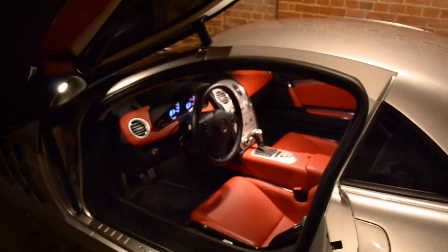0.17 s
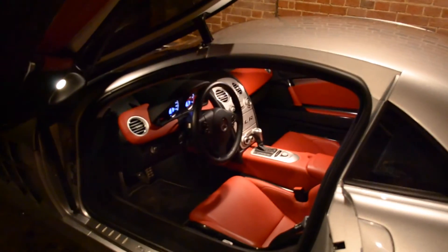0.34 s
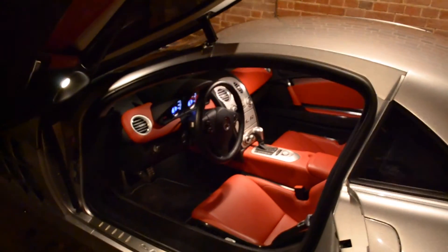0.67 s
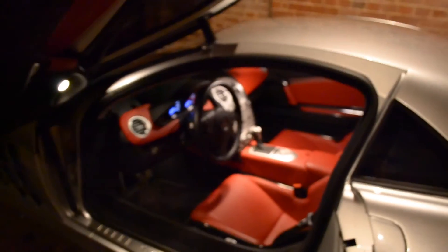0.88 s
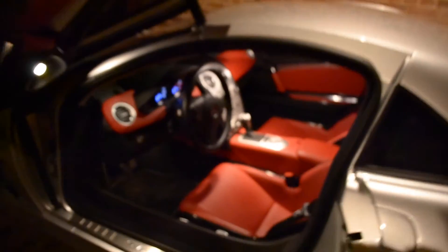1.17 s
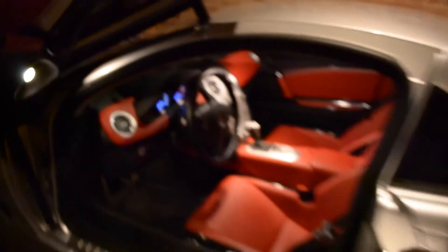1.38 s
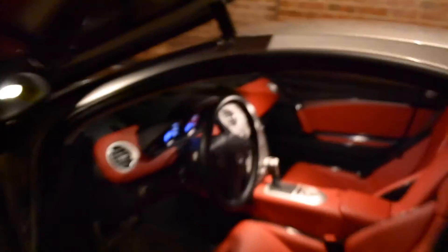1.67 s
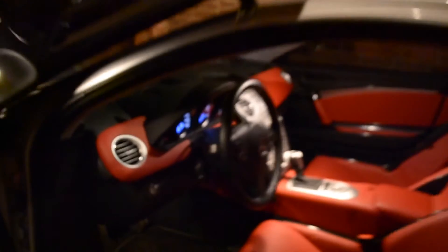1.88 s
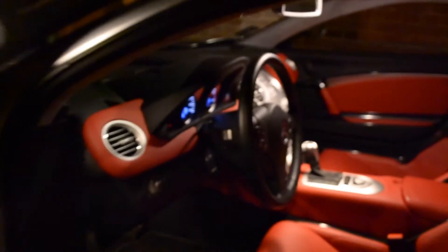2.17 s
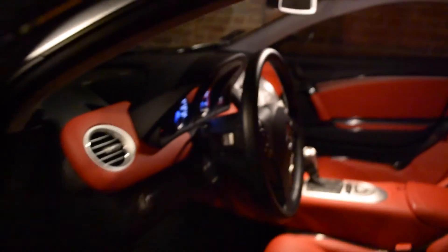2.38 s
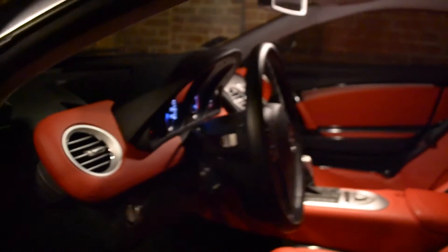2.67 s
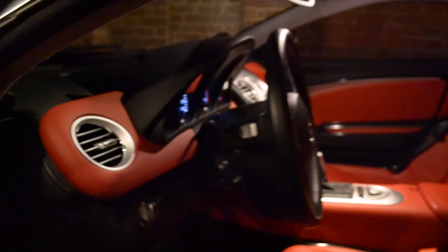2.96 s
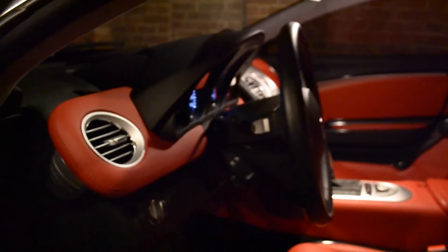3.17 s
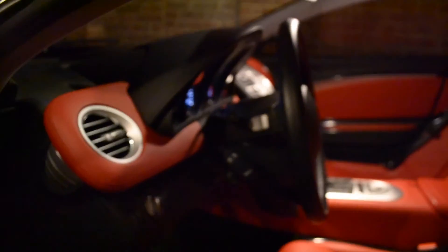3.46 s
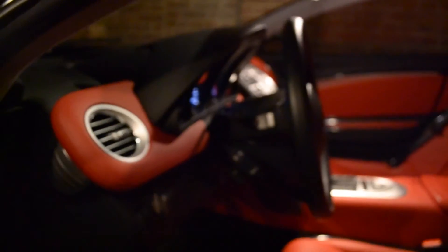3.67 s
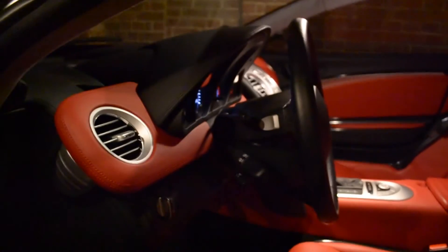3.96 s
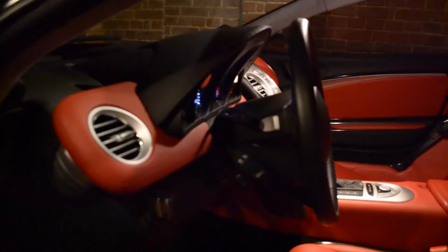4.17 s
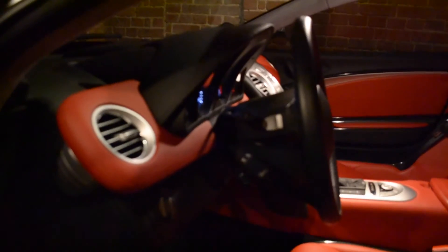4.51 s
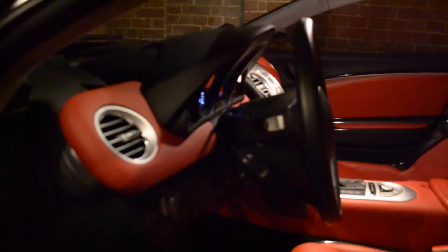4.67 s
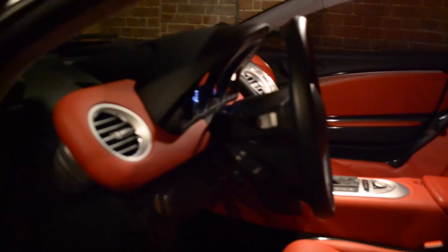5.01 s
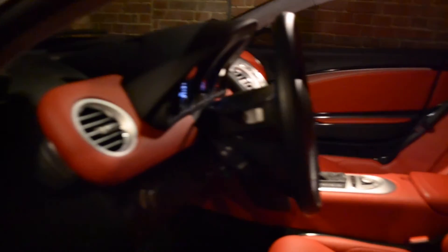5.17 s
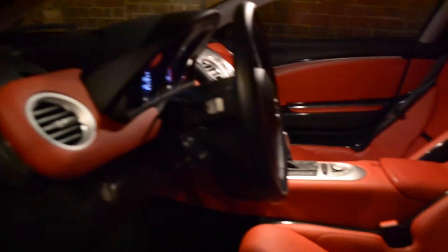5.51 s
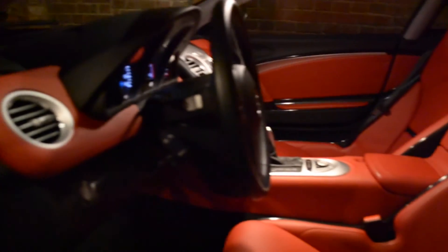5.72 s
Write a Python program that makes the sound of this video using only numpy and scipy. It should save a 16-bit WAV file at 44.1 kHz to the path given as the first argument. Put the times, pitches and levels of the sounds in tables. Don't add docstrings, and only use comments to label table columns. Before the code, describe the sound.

Very close to a camera's built-in microphone, a tiny focus motor hisses, rattles and whines in brief bursts during the first second. Fingers creak on plastic, then one very loud, sharp snap bounces quickly. Cloth rustles softly, the motor hunts again after three seconds, and quiet garage air remains.

```python
import sys
import numpy as np
from scipy import signal
from scipy.fft import rfft, irfft
from scipy.io import wavfile
from scipy.ndimage import uniform_filter1d

SR = 44100
rng = np.random.default_rng(int(sys.argv[2]) if len(sys.argv) > 2 else 0)


def put_to_file(sound):
    columns = np.atleast_2d(sound).T
    safe = np.clip(columns, -1, 1)
    whole_steps = np.round(safe * 32767)
    wavfile.write(sys.argv[1], SR, whole_steps.astype(np.int16))


def magnitude_from_level(level_db):
    exponent = np.asarray(level_db, float) / 20
    return 10 ** exponent


N = 257984
T = np.arange(N) / SR

# on_s, off_s
POWER_SPELLS = [
    (-.1, .046),
    (.101, .368),
    (.429, .826),
    (3.270, 3.598),
    (3.645, 4.236),
    (4.322, 4.394),
]
# time_s, tooth_rate_hz
GEAR_SPEEDS = [
    [(.14, 860), (.195, 1250), (.245, 1740), (.275, 1610), (.36, 1530)],
    [(.47, 900), (.525, 1350), (.555, 1640), (.62, 1600), (.68, 1520), (.73, 1620), (.82, 1490)],
    [(3.298, 830), (3.32, 1050), (3.345, 1310), (3.39, 1455), (3.445, 1380), (3.475, 1270), (3.51, 680)],
    [(3.72, 1320), (3.77, 1740), (3.822, 1720), (3.858, 1520), (3.91, 1650), (4.03, 1490), (4.07, 1510),
     (4.125, 1680), (4.23, 1510)],
    [(4.361, 1310), (4.37, 1350), (4.379, 1290)],
]
# hiss_at_cruise_db, barrel_rattle_db
DRIVE_EFFORT = [(-65, -57.5), (-60.5, -60.5), (-66.5, -59), (-63.5, -60.5), (-62, -61), (-65, -61.5)]
# freq_hz, density_db
DRIVE_COLOUR = [(120, -52.5), (200, -33), (520, -14), (1200, -15.5), (1550, -6), (1900, -1.5),
                (2200, -14.5), (2650, -3.5), (3700, -35.5), (4760, -22.5), (5530, -40.5), (9780, -28),
                (11000, -62), (14300, -74), (22000, -120)]
# freq_hz, width_hz, level_db
BARREL_MODES = [(446, 44, -10.5), (990, 300, -10), (1992, 310, -9.5), (2617, 57, 3), (3230, 350, -3.5),
                (4133, 420, -1), (5550, 220, -3), (5630, 160, -3), (6360, 500, -9.5), (7060, 520, -14.5),
                (8400, 430, -14.5), (9070, 180, -11), (9970, 330, -15)]
# multiple, level_re_unflared_third_db
OVERTONES = [(2, 3), (4, -6), (5, -4), (6, -9)]

# freq_hz, density_db
QUIET_COLOUR = [(21, -53), (35, -28.5), (59, -10.5), (81, -9), (102, -16), (133, -6.5), (157, -22.5),
                (182, -4), (236, -11), (266, -6), (472, -12), (1410, -7.5), (2230, -16), (6670, -30),
                (10500, -40), (13600, -81), (22000, -120)]
# freq_hz, density_db
TRAFFIC_COLOUR = [(88, -37.5), (150, -12.5), (230, -16.5), (313, -14), (449, -15), (846, -3.5), (1300, -1),
                  (3760, -20.5), (7980, -39.5), (9000, -32.5), (11700, -64.5), (19800, -120)]
# time_s, level_db
TRAFFIC_LEVELS = [(0, -57.5), (.9, -55), (1.4, -58), (1.6, -54.5), (2.3, -64.5), (2.5, -66.5), (3.2, -68.5),
                  (3.6, -78), (5.05, -77), (5.85, -73)]
# start_s, length_s, level_db
SLEEVE_MOVES = [
    (1.284, .2, -71),
    (1.545, 0.737, -60.5),
    (2.354, 0.105, -65.5),
    (2.602, .7, -72),
    (5.141, .28, -73.5),
]

# thud_db, edge_db, tick_db, t60_ms, rise_ms
JOLT = (-15, -2.5, -3.5, 28, 1.04)
SLAP = (-39, -2, -3, 37, 2.5)
STOP = (-17, 6.5, -20, 39, 0.5)
BUMP = (-7.5, -22, -20, 26, 1)
TICK = (-4, -9.5, -4, 35, 2.5)
# start_s, peak_db, hardness_db
JOLTS = [(0.1, -38.5, 4), (0.4281, -30, -3), (3.2695, -47.5, 6.5), (3.644, -38, 2.5), (4.3215, -41.5, 9)]
# start_s, peak_db, hardness_db
SLAPS = [(0.1114, -33, -10), (0.1159, -31.5, 0.5), (0.4464, -35.5, 4.5), (0.454, -39, 4.5),
         (3.3064, -53, -9), (3.6548, -35.5, -13), (3.6606, -37, 3), (4.3303, -36, -8), (4.3349, -39, 5)]
# start_s, peak_db, hardness_db
STOPS = [(0.039, -49, -1), (0.3614, -33.5, -2.5), (3.59, -45, -2.5), (4.2277, -34.5, -1.5)]
# start_s, peak_db, hardness_db
BUMPS = [(.4832, -40.5, 4), (.6954, -32.5, -1), (0.7706, -54, 8), (0.818, -27, 4.5), (3.1007, -45, 3),
         (3.29, -41, -5), (3.4434, -40, -5), (3.699, -36, -3), (3.7573, -37, -9), (4.0008, -40.5, 9),
         (4.3879, -34, -3.5)]
# start_s, peak_db, hardness_db
TICKS = [(1.261, -56.5, 13), (1.6515, -43.5, 0), (1.6754, -43.5, -3.5), (1.809, -50, 6.5), (2.079, -57, -6),
         (2.5505, -48.5, -7.5), (2.8583, -50.5, -5)]

# start_s, peak_db, centre_hz, t60_ms
CREAKS = [(1.495, -30.5, 1247, 47), (1.503, -47, 1200, 41), (1.508, -33.5, 439, 28),
          (1.519, -35.5, 540, 170), (1.526, -41, 705, 59), (1.533, -58, 596.7, 65), (1.54, -36, 663.3, 89),
          (1.592, -36, 454.7, 100), (2.046, -44.5, 650, 75), (2.147, -39.5, 600, 83), (2.161, -43, 587, 63),
          (2.19, -46.5, 830, 64), (2.339, -38, 930, 29), (2.35, -45.5, 450, 205), (2.55, -50, 854, 47),
          (4.372, -46.5, 514, 53)]
# start_s, peak_db, brightness_0_to_1
SNAP_CONTACTS = [
    (1.5712, -.5, 1),
    (1.5737, -16, .2),
    (1.5856, -25, .5),
    (1.5870, -21, 1),
    (1.5920, -22, 1),
    (1.5950, -29, .3),
    (1.6105, -30, .8),
    (1.619, -36, .1),
]
# freq_hz, level_db, t60_s
SNAP_MODES = [(400, -16, .010), (650, -15, .009), (1500, -9, .007), (1990, -7, .013), (2540, -2.5, .011),
              (2800, -3.5, .013), (3250, -6, .008), (3720, -1, .012), (4250, -7, .006), (5020, -1, .007),
              (6470, 0, .007), (7550, 1.5, .007), (8700, -2, .005), (9600, -2, .006)]


def level(x, db):
    return x * magnitude_from_level(db) / np.sqrt(np.mean(x ** 2))


def colour(points):
    point_hz, point_db = np.transpose(points)
    hz = np.maximum(np.arange(N // 2 + 1) * SR / N, 1)
    gain = magnitude_from_level(np.interp(np.log(hz), np.log(point_hz), point_db))
    return level(irfft(rfft(rng.standard_normal(N)) * gain, N), 0)


def band(x, hz, width_hz):
    return signal.lfilter(*signal.iirpeak(hz, hz / width_hz, fs=SR), x)


def walk(rate_hz):
    hold = int(SR / rate_hz)
    steps = np.repeat(rng.standard_normal(N // hold + 1), hold)
    smooth = uniform_filter1d(uniform_filter1d(steps, hold), hold)
    return level(smooth[:N], 0)


def burst(start_s, rise_ms, t60_ms):
    t = np.arange(int(.2 * SR)) / SR
    rise = np.minimum(t / max(rise_ms / 1000, 1e-4), 1)
    decay = magnitude_from_level(-60 * np.maximum(t - rise_ms / 1000, 0) / max(t60_ms / 1000, .003))
    first = int(start_s * SR)
    return slice(first, first + len(t)), rise * decay


def barrel(x):
    return sum((-1) ** k * magnitude_from_level(db) * band(x, hz, width_hz)
               for k, (hz, width_hz, db) in enumerate(BARREL_MODES))


def powered():
    on = sum((T > on_s) & (T < off_s) for on_s, off_s in POWER_SPELLS) * 1.
    return signal.lfilter([.01], [1, -.99], on)


def tooth_whine(tooth_hz):
    wobble = .010 * walk(300) + .009 * walk(60)
    phase = 2 * np.pi * np.cumsum(tooth_hz * (1 + wobble)) / SR + .2 * walk(900)
    tone_db = -53 + 26 * np.minimum(np.log2(tooth_hz / 1580), 0)
    third_db = -66
    flare_db = 12.5 * np.exp(-((tooth_hz - 1200) / 360) ** 2)
    partials = [(1, tone_db), (3, third_db + flare_db)]
    partials += [(k, third_db + db) for k, db in OVERTONES]
    whine = sum(magnitude_from_level(db + 3.5 * walk(150)) * np.sin(k * phase) for k, db in partials)
    return whine - .5 * barrel(whine)


def motor():
    starts_s = np.array(POWER_SPELLS)[:, 0]
    spell = np.searchsorted(starts_s, T) - 1
    hiss_db, rattle_db = np.array(DRIVE_EFFORT)[spell].T
    gears_on = sum((T > g[0][0]) & (T < g[-1][0]) for g in GEAR_SPEEDS) * 1.
    turning = uniform_filter1d(gears_on, size=600)
    tooth_hz = np.interp(T, *np.transpose(np.vstack(GEAR_SPEEDS)))
    hiss_db = hiss_db - 10.5 * (1 - turning * np.minimum(tooth_hz / 1580, 1))
    rattle_db = rattle_db + 6 * np.exp(-(T - starts_s[spell]) / .06)
    grit = magnitude_from_level(1.08 * walk(300))
    hiss = magnitude_from_level(7.5) * colour(DRIVE_COLOUR) * magnitude_from_level(hiss_db + 2.36 * walk(40))
    rattle = level(barrel(rng.standard_normal(N) * grit), 0) * magnitude_from_level(rattle_db + 2.0 * walk(30.027))
    return powered() * (hiss + rattle + turning * tooth_whine(tooth_hz))


def sleeve():
    rise_db_s, fall_db_s = 142.5, 77
    moves_db = [db - rise_db_s * np.maximum(s - T, 0) - fall_db_s * np.maximum(T - s - length_s, 0)
                for s, length_s, db in SLEEVE_MOVES]
    cloth = colour([(200, -10), (400, 0.0), (900, -5), (2500, -2.0), (5000, -6.5),
                    (7300, -11.0), (9300, -12.0), (11000, -22)])
    return cloth * magnitude_from_level(np.max(moves_db, axis=0) + 1.0 * walk(18) + 1.2 * walk(200))


def garage():
    still = level(colour(QUIET_COLOUR) * magnitude_from_level(0.34 * walk(4.3)), -66)
    traffic_db = np.interp(T, *np.transpose(TRAFFIC_LEVELS))
    traffic = colour(TRAFFIC_COLOUR) * magnitude_from_level(traffic_db + 1.9 * walk(5.3))
    air = still + traffic + sleeve()
    return air - 0.72 * band(air, 7930, 600)


def knocks():
    out = np.zeros(N)
    kinds = [(JOLT, JOLTS), (SLAP, SLAPS), (STOP, STOPS), (BUMP, BUMPS), (TICK, TICKS)]
    for (thud_db, edge_db, tick_db, t60_ms, rise_ms), rows in kinds:
        for start_s, peak_db, hard_db in rows:
            at, env = burst(start_s, rise_ms, t60_ms)
            blow = env * rng.standard_normal(len(env))
            body = barrel(blow) + 0.25 * blow
            ring = band(band(body, 1550, 1840), 1950, 2300)
            thud = band(band(blow, 533, 280) + band(blow, 990, 300), 400, 890)
            edge = band(band(env ** 1.1 * body, 4270, 2050), 4640, 2200)
            tick = band(band(env ** 3.8 * blow, 8500, 1800), 7000, 2500)
            parts = [(0, ring), (thud_db, thud), (edge_db + hard_db, edge), (tick_db + 1.09 * hard_db, tick)]
            out[at] += sum(magnitude_from_level(peak_db + db) * part / np.abs(part).max() for db, part in parts)
    return out


def creaks():
    out = np.zeros(N)
    for start_s, peak_db, hz, t60_ms in CREAKS:
        at, env = burst(start_s, 0.91, t60_ms)
        slip = env * rng.standard_normal(len(env))
        thud = band(band(band(slip, hz, 900), 720, 1500), 720, 1800)
        out[at] += magnitude_from_level(peak_db) * thud / np.abs(thud).max()
    return out


def snap():
    t = np.arange(int(.06 * SR)) / SR
    hz, mode_db, t60_s = np.transpose(SNAP_MODES)[:, :, None]
    signs = (-1.) ** np.arange(len(hz))[:, None]
    modes = magnitude_from_level(-60 * t / t60_s) * np.sin(2 * np.pi * hz * t)
    onset = 1 - np.exp(-1000 * t / .3)
    out = np.zeros(N)
    for start_s, peak_db, bright in SNAP_CONTACTS:
        loss_db = 12 * (1 - bright) * np.maximum(np.log2(hz / 2500), 0)
        ring = np.sum(signs * magnitude_from_level(mode_db - loss_db) * modes, axis=0) * onset
        first = int(start_s * SR)
        out[first:first + len(t)] += magnitude_from_level(peak_db) * ring / np.abs(ring).max()
    snap_s = SNAP_CONTACTS[0][0]
    at, env = burst(snap_s, 0.51, 6)
    out[at] += env * level(band(rng.standard_normal(len(env)), 7400, 9000), -14)
    at, env = burst(snap_s, 3, 140)
    out[at] += env * level(band(rng.standard_normal(len(env)), 1900, 4496), -38.5)
    return out


def snap_jolt():
    return magnitude_from_level(-48) * np.exp(-((T - SNAP_CONTACTS[0][0] - .001) / 0.0016) ** 2)


def scene():
    body = motor() + knocks() + creaks() + snap()
    low_cut = signal.butter(2, 260, "high", fs=SR, output="sos")
    return (signal.sosfilt(low_cut, body) + snap_jolt() + garage())[None]


def low_pass(x):
    return signal.sosfilt(signal.butter(12, 11200, fs=SR, output="sos"), x)


def record(dry):
    overload = 0.8
    x = overload * np.tanh(dry / overload)
    x = signal.sosfilt(signal.butter(6, 10400, fs=SR, output="sos"), x)
    x = signal.sosfilt(signal.ellip(10, .5, 80, 10900, fs=SR, output="sos"), x)
    return low_pass(x)


dry = scene()
out = record(dry)
put_to_file(out)
```